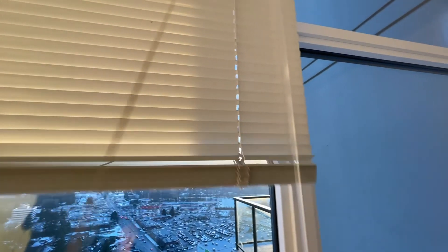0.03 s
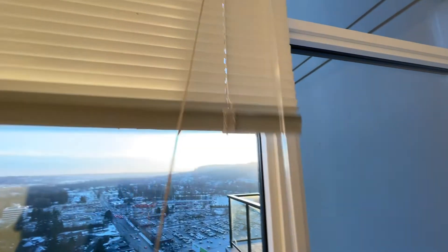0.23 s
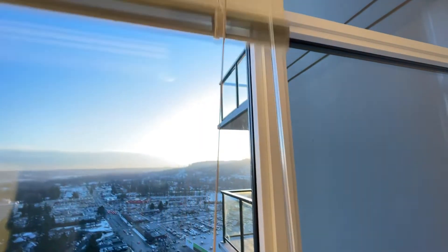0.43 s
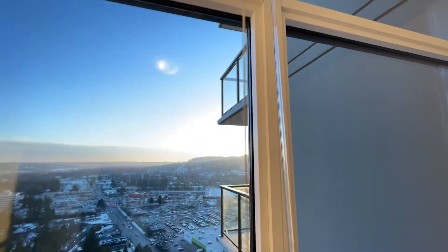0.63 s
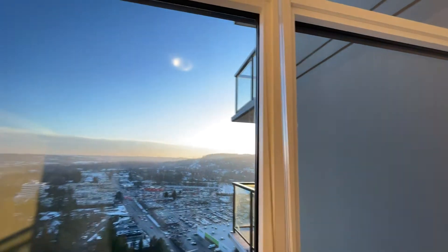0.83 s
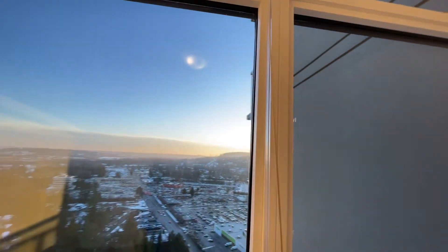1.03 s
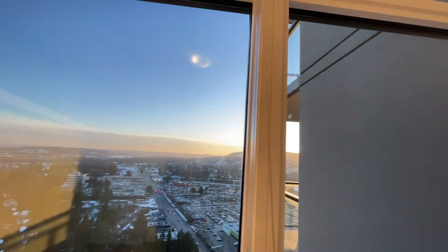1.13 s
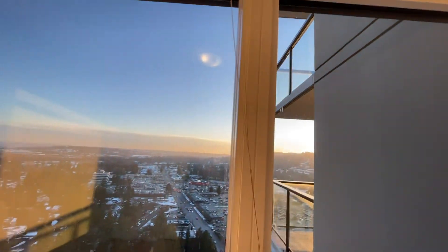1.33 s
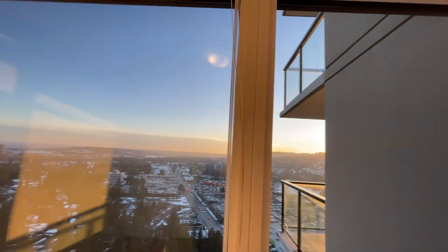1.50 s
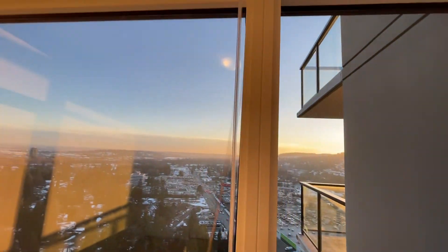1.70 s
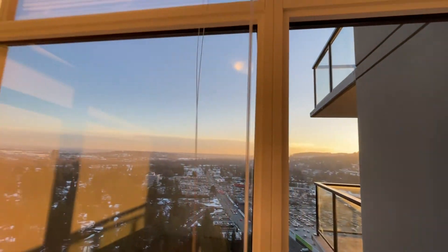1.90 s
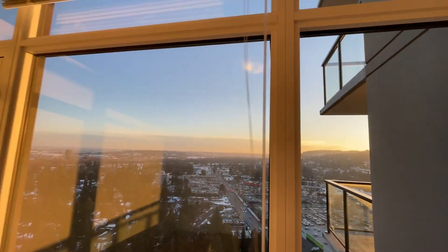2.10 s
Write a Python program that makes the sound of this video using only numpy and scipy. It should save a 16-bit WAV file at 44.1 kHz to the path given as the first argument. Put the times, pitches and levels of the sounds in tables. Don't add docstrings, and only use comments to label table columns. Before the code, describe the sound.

A slatted blind is pulled up with a quick scraping clatter, then a cord end clicks

```python
import sys
import numpy as np
from scipy import signal
from scipy.fft import rfft, irfft, next_fast_len
from scipy.io import wavfile
from scipy.ndimage import uniform_filter1d, map_coordinates

SR = 44100
rng = np.random.default_rng(int(sys.argv[2]) if len(sys.argv) > 2 else 0)


def int16_out(signal):
    q = np.round(np.clip(np.atleast_2d(signal).T, -1, 1) * 32767)
    wavfile.write(sys.argv[1], SR, q.astype(np.int16))


def volts(x):
    e = np.asarray(x, float) / 20
    return 10 ** e


N = 94903

# pitch_hz, level_db (per Hz)
VENT_RUSH = [(15, -29.5), (25, -17), (55, -1.5), (270, -15.5), (301, -16.5), (734, -17.5), (3080, -29),
             (13600, -62), (16000, -53)]
# pitch_hz, level_db (rms)
VENT_HUM = [(60, -59), (120, -63.5), (199, -60.5)]
# pitch_hz, correlation (-1 to 1)
PORT_LIKENESS = [(60, 0.66), (240, 0.78), (950, 0.075), (3770, -1), (15000, 0.35)]
VENT_DB = -50.5

# start_s, level_db
RUSTLE = [
    (.75, -48),
    (.95, -53.5),
    (1.12, -59.5),
    (1.33, -58.5),
    (1.39, -50),
    (1.46, -54.5),
    (1.52, -59.5),
    (1.8, -58),
    (2.15, -75),
]
# pitch_hz, level_db (per Hz)
CLOTH_COLOUR = [(88, -44.5), (150, -15.5), (291, -11.5), (414, -21), (1100, -10.5), (6770, -28),
                (14000, -38), (16000, -71)]
# start_s, level_db, centre_hz, width_octaves, t60_s
STACK_BUMPS = [
    (0.838, -33, 1890, 0.72, 0.23),
    (1.032, -35, 3050, 1.24, 0.1),
    (1.033, -36.5, 1940, 0.66, 0.23),
    (1.177, -36, 790, 1.04, 0.041),
    (1.19, -43.5, 396, 1.1, 0.18),
    (1.4, -41, 301, 0.27, 0.29),
    (1.85, -62, 14060, 0.04, 0.15),
]

# pitch_hz, level_db (per Hz)
SLEEVE_COLOUR = [(1180, -24), (2000, -1.5), (5420, -3), (8130, 0.5), (14500, 1), (16500, -16)]
BRUSH_S, BRUSH_DB, BRUSH_RISE_S, BRUSH_T60_S = 1.539, -36, 0.0026, 0.029
FLICK_GAP_S, SWISH_DB, SWISH_T60_S = 0.0092, -15.5, 0.38

# pitch_hz, level_db
PANE_SWING = [(62, -49.5), (104, -49), (122, -48.5), (170, -49)]
SWING_RISE_S, SWING_T60_S = 0.028, 0.39

# pitch_hz, level_db, t60_s
FRAME_MODES = [(508, -5.5, 0.081), (1113, -5.5, 0.058), (1395, -13, 0.033), (1720, -7, 0.075),
               (2205, -1.5, 0.11), (2780, 2.5, 0.057), (3280, -13, 0.047), (3840, -7.5, 0.16),
               (4380, -5.5, 0.11), (4950, -9, .08), (6080, -7, 0.027), (12030, -5, 0.088)]
# pitch_hz, level_db (per Hz)
SNAP_COLOUR = [(180, -30), (400, -28), (946, -13), (2250, -4.5), (3500, -1.5), (7440, -17), (12100, -13),
               (16000, -23)]
# pitch_hz, level_db (per Hz)
SHUDDER_COLOUR = [(180, -35), (300, -15), (521, -10.5), (2480, -8.5), (2770, -10), (7490, -20.5),
                  (9050, -24.5), (12400, -14.5), (13000, -54)]
# pitch_hz, level_db, t60_s
TASSEL_MODES = [(1350, -9, .012), (2200, -1, .012), (3400, 0, .01), (6050, -11, .008), (12000, -15, .008)]
# start_s, level_db
TASSEL_CONTACTS = [
    (1.6172, -19),
    (1.6193, -15.5),
    (1.623, -26),
]
KNOCK_S, KNOCK_DB, KNOCK_CRACK_DB, KNOCK_RISE_S = 1.6167, -28.5, 9.5, 0.00082
SHUDDER_DB, SHUDDER_T60_S = -2, 0.27
BAR_HZ, BAR_DB, BAR_RISE_S, BAR_T60_S = 8780, -0.5, 0.02, 0.22

# start_s, level_db
PULL_EFFORT = [
    (0.0, -37.5),
    (0.176, -33),
    (0.306, -30.5),
    (0.538, -27.5),
    (0.6, -28.5),
    (0.726, -32),
    (0.856, -54),
    (0.95, -63),
]
# pitch_hz, level_db (per Hz)
CORD_COLOUR = [(180, -41.5), (300, -13), (780, -2.5), (1510, -5), (1800, -1), (2700, 1.5), (6400, -2.5),
               (12300, -9), (15600, -15.5), (16500, -19)]
CORD_PATCHY_DB, CORD_WIDTH_DB = 3, 0.5

# start_s, peak_db, thud_db, rail_hum_db, sizzle_db
SLAT_CLACKS = [(0.0478, -34, -22, -25, 2.5), (0.1318, -8, -17, -15, -20), (0.1341, -16, -12.5, -35.5, 5.5),
               (0.1495, -32.5, -22, -34, -9.5), (0.1665, -20.5, -22.5, -27.5, -0.5),
               (0.1742, -15, -14, -32, -3), (0.2003, -9.5, -16.5, -16, -3.5),
               (0.2029, -18.5, -25, -32.5, -1), (0.2614, -21, -19, -32, -6.5),
               (0.278, -24.5, -7.5, -31.5, -5), (0.3316, -26, -6.5, -28, 0),
               (0.3518, -18.5, -14.5, -27.5, -0.5), (0.3548, -27, -4.5, -34.5, 6),
               (0.3635, -36.5, -19, -32, -1), (0.373, -27, -19, -29, -1), (0.3755, -9, -16.5, -23, -1.5),
               (0.3795, -20.5, -17, -32, 4.5), (0.385, -25.5, -24, -30, -4.5),
               (0.4057, -17.5, -13.5, -33, -7), (0.4296, -38, -22.5, -20, -3),
               (0.4771, -25, -24.5, -15, 10.5), (0.4914, -21.5, -4.5, -16, 4), (0.5238, -21, -15.5, -8, 4),
               (0.5404, -21, -15, -27, -5), (0.5477, -13, -12, -14.5, -1), (0.553, -17, -35, -15.5, -2),
               (0.565, -16.5, -16, -26, -1), (0.576, -24, -14, -19, -3), (0.6007, -30, -25, -12.5, 2),
               (0.625, -13.5, -30, -11, -8.5), (0.6285, -22.5, -24.5, -12, 8.5),
               (0.6557, -20.5, -12, -31, -10), (0.675, -14, -22, -27, -2), (0.68, -23, -17, -24, 1),
               (0.71, -29.5, -13, -4.5, -11), (0.7327, -22.5, -17.5, -6, -12)]
# pitch_hz, level_db, t60_s
THUD_MODES = [(780, 1, .012), (1230, 8, .015)]
# pitch_hz, level_db, t60_s
RAIL_MODES = [(2220, -12, .012), (2630, -7, .015), (3020, -10, .012), (3560, -12, .01), (4320, -12, .025),
              (4600, -3, .007), (5090, -1, .008), (6300, -6, .007), (6900, -10, .006)]
# pitch_hz, level_db, t60_s
RAIL_HUM_MODES = [(1530, 4, .055)]
# pitch_hz, level_db, t60_s
SIZZLE_MODES = [(8540, -9, 0.021), (9200, 4, 0.0043), (9840, -2, 0.0079), (11400, 6, 0.0054),
                (12200, 5.5, 0.0039), (14240, -6, 0.013), (15300, -5, 0.0073)]
CONTACTS_S, CONTACT_LOSS_DB, CRACK_DB = 0.0021, 13, -1.5
TICKS_PER_S, TICK_DB, TICK_SPREAD_DB = 600, 6.5, 3
HIT_SCATTER_DB, HIT_DETUNE, HIT_RISE_S = 2, .015, .0009

# pitch_hz, t60_s
ROOM_DECAY = [(200, 0.63), (1500, 0.53), (4000, 0.43), (12000, 0.24)]
# pitch_hz, left_over_right_db
BLIND_LEAN = [(60, 0.5), (180, -4.5), (550, 7), (1650, -7), (3000, -0.5), (5500, 12), (9000, -1.5),
              (15000, -1.5)]
# pitch_hz, left_over_right_db
FRAME_LEAN = [(300, -4.5), (2500, 1), (7000, 5)]
BLIND_ROOM_DB, KNOCK_ROOM_DB, ROOM_GAP_S = -5.5, -3.5, .004
ROOM_TURN_S = .13
BLIND_LAG_S, KNOCK_LAG_S = -.00022, -.0001
BLIND_SPAN_S, KNOCK_SPAN_S = (0, 1.2), (1.55, 2.1)

# pitch_hz, width_hz, level_db
PORT_NOTCHES = [(5540, 210, -7), (7530, 176, -13.5), (10530, 450, -8)]
# start_s, end_s, low_hz, high_hz
DROPPED_BANDS = [(0, .125, 10600, 11000), (.215, .33, 10150, 10700), (.41, .46, 10300, 10900),
                 (.57, .61, 10400, 10900), (.71, .965, 10500, 11300), (1.03, 1.385, 10400, 11100),
                 (1.45, 1.52, 10200, 11000), (1.71, 1.93, 10200, 10900), (.71, 1.535, 15100, 20000),
                 (1.633, 1.83, 12700, 20000), (1.83, 2.2, 15000, 20000)]
LOW_CUT_HZ, TOP_HZ, MONO_HZ = 39.7, 15900, 11800


def unit(x):
    return x / np.sqrt(np.mean(x ** 2) + 1e-20)


def along(points, hz):
    f, v = np.transpose(points)
    return np.interp(np.log(hz + 1), np.log(f + 1), v)


def filtered(x, response):
    m = next_fast_len(N + 8192)
    return irfft(rfft(x, m) * response(np.fft.rfftfreq(m, 1 / SR)), m)[..., :N]


def level(rows):
    s, db = np.transpose(rows)
    return volts(np.interp(np.arange(N) / SR, [s[0] - .1, *s, s[-1] + 0.55], [-100, *db, -100]))


def dying(start_s, rise_s, t60_s):
    t = np.maximum(np.arange(N) / SR - start_s, 0)
    return (1 - np.exp(-t / rise_s)) * volts(-60 * t / t60_s)


def rush(spectrum, patchy_db, channels):
    z = signal.stft(rng.standard_normal((channels, N)), nperseg=256)[2]
    field = uniform_filter1d(rng.standard_normal(z.shape[1:]), 5, 0)
    field = uniform_filter1d(field, 6, 1)
    x = signal.istft(z * volts(patchy_db * unit(field)), nperseg=256)[1][:, :N]
    return unit(filtered(x, lambda hz: volts(along(spectrum, hz))))


def rung(at_s, size_db, modes):
    t = np.arange(round(SR * np.max(np.transpose(modes)[2]))) / SR
    out = np.zeros(N + SR)
    luck = rng.standard_normal((len(at_s), 2, len(modes), 1))
    hz, db, t60 = np.transpose(modes)[:, :, None]
    rise = 1 - np.exp(-t / HIT_RISE_S)
    for s, size, (louder, sharper) in zip(at_s, size_db, luck):
        pitch = hz * (1 + HIT_DETUNE * sharper * 0.017 / t60)
        decay = volts(db + size + HIT_SCATTER_DB * louder - 60 * t / t60)
        ring = decay * np.sin(2 * np.pi * pitch * t)
        out[round(s * SR):][:len(t)] += ring.sum(0) * rise
    return out[:N]


def room(x, wet_db, lean, lag_s, span_s):
    size = round(ROOM_TURN_S * SR)
    first, last = (int(s / ROOM_TURN_S) for s in span_s)
    parts = np.pad(x, (0, -N % size)).reshape(-1, 1, size)[first:last]
    hz, t, z = signal.stft(rng.standard_normal((len(parts), 2, SR // 3)), SR, nperseg=256)
    decay = volts(-60 * t / along(ROOM_DECAY, hz)[:, None])
    tails = signal.istft(z * decay, SR, nperseg=256)[1]
    tails = tails / np.linalg.norm(tails, axis=2, keepdims=True)
    answers = signal.fftconvolve(parts, tails, axes=2)
    wet = np.zeros((2, 2 * N))
    for k, answer in enumerate(answers, first):
        start = k * size + round(ROOM_GAP_S * SR)
        wet[:, start:][:, :answer.shape[1]] += answer

    def ports(f):
        half = volts(along(lean, f) / 2) * np.exp(-1j * np.pi * f * lag_s)
        return np.array([half, 1 / half])

    return filtered(x, ports) + volts(wet_db) * wet[:, :N]


def air():
    def mid_side(hz):
        turn = np.arccos(np.clip(along(PORT_LIKENESS, hz), -1, 1)) / 2
        return np.array([np.cos(turn), np.sin(turn)])

    mid, side = filtered(rush(VENT_RUSH, 0.88, channels=2), mid_side)
    t = np.arange(N) / SR
    drift = np.cumsum(rng.standard_normal((len(VENT_HUM), N)), 1) * 0.024
    hum = sum(volts(db + 2.5) * np.sin(2 * np.pi * hz * t + d) for (hz, db), d in zip(VENT_HUM, drift))
    return volts(VENT_DB - 1) * unit(np.array([mid + side, mid - side])) + hum


def handling():
    out = volts(4) * level(RUSTLE) * rush(CLOTH_COLOUR, 1.5, channels=2)
    for s, db, hz, octaves, t60 in STACK_BUMPS:
        near, far = 2 ** octaves, 8 ** octaves
        band = [(hz / far, -70), (hz / near, -6), (hz, 0), (hz * near, -8), (hz * far, -70)]
        out = out + volts(db) * dying(s, t60 / 20, t60) * rush(band, 2, channels=2)
    return out


def brush():
    flicks = sum(dying(BRUSH_S + gap, BRUSH_RISE_S, BRUSH_T60_S) for gap in (0, FLICK_GAP_S))
    before_knock = np.arange(N) < KNOCK_S * SR
    swish = volts(SWISH_DB) * dying(BRUSH_S, .005, SWISH_T60_S) * before_knock
    return volts(BRUSH_DB) * (flicks + swish) * rush(SLEEVE_COLOUR, 1.2, channels=2)


def thump():
    t = np.arange(N) / SR - KNOCK_S
    swing = sum(volts(db + 11.0) * np.sin(2 * np.pi * hz * t) for hz, db in PANE_SWING)
    return dying(KNOCK_S, SWING_RISE_S, SWING_T60_S) * swing


def knock():
    t = np.arange(N) / SR
    rows = len(FRAME_MODES) + 1
    grid = np.meshgrid(np.arange(rows), t * 135, indexing="ij")
    flutter = 0.76 + 0.78 * map_coordinates(rng.standard_normal((rows, 300)), grid, order=1)
    ring = np.zeros(N)
    for (hz, db, t60), wave in zip(FRAME_MODES, flutter):
        tone = np.sin(2 * np.pi * hz * (t - KNOCK_S))
        ring += volts(db + 2.5) * dying(KNOCK_S, KNOCK_RISE_S, t60) * tone * wave
    bar = np.sin(2 * np.pi * BAR_HZ * t) * flutter[-1]
    ring += volts(BAR_DB) * dying(KNOCK_S, BAR_RISE_S, BAR_T60_S) * bar
    snap = volts(KNOCK_CRACK_DB) * dying(KNOCK_S, 0.00044, 0.027) * rush(SNAP_COLOUR, 0, channels=1)[0]
    shudder = volts(SHUDDER_DB) * dying(KNOCK_S, .003, SHUDDER_T60_S) * rush(SHUDDER_COLOUR, 2, channels=1)[0]
    return volts(KNOCK_DB) * (ring + snap + shudder) + rung(*np.transpose(TASSEL_CONTACTS), TASSEL_MODES)


def cord():
    hiss = rush(CORD_COLOUR, CORD_PATCHY_DB, channels=2)
    return volts(CORD_WIDTH_DB) * level(PULL_EFFORT) * hiss * volts([[1.2], [-1.2]])


def blind():
    rows = np.array(SLAT_CLACKS)
    luck = rng.random((len(rows), 2, 3))
    k = np.arange(3)
    at = (rows[:, :1] + HIT_RISE_S / 2 + CONTACTS_S * k * (0.79 + .6 * luck[:, 0])).ravel()
    size_db = rows[:, 1:2] - CONTACT_LOSS_DB * k - 4 * luck[:, 1] * (k > 0)
    clack = rung(at, size_db.ravel(), RAIL_MODES)
    for extra_db, modes in zip(rows[:, 2:].T, (THUD_MODES, RAIL_HUM_MODES, SIZZLE_MODES)):
        clack += rung(at, (size_db + extra_db[:, None]).ravel(), modes)

    blows = np.bincount(np.round(at * SR).astype(int), volts(size_db + CRACK_DB).ravel(), N)
    t = np.arange(400) / SR
    burst = volts(-60 * t / 0.0054) * (1 - np.exp(-t / HIT_RISE_S))
    crack = np.convolve(blows, burst)[:N]

    hail = rng.random((2, N))
    ticks = (hail[0] < TICKS_PER_S / SR) * volts(-TICK_SPREAD_DB * np.log(hail[1] + 1e-4))
    ticks = np.convolve(ticks, volts(-60 * t / 0.0018))[:N]
    ticks = volts(TICK_DB - 16.5) * unit(ticks)
    hiss = rush(CORD_COLOUR, CORD_PATCHY_DB, channels=1)[0]
    return clack + crack * rush(CORD_COLOUR, 0, channels=1)[0] + level(PULL_EFFORT) * ticks * hiss


def scene():
    behind = air() + handling() + brush() + thump()
    struck = room(knock(), KNOCK_ROOM_DB, FRAME_LEAN, KNOCK_LAG_S, KNOCK_SPAN_S)
    hauled = room(blind(), BLIND_ROOM_DB, BLIND_LEAN, BLIND_LAG_S, BLIND_SPAN_S)
    return behind + struck + cord() + hauled


def low_pass(x):
    return signal.sosfilt(signal.butter(12, 16610, fs=SR, output="sos"), x)


def record(dry):
    def ports(f):
        dips_db = sum(db * np.exp(-((f - centre) / width) ** 2) for centre, width, db in PORT_NOTCHES)
        low_cut = 1 / (1 + (LOW_CUT_HZ / (f + 1)) ** 4)
        top_cut = volts(-45 / (1 + np.exp((TOP_HZ - f) / 50)))
        return volts(dips_db) * low_cut * top_cut

    def above(f, edge_hz):
        return .5 + .5 * np.tanh((f - edge_hz) / 60)

    heard = filtered(dry, ports)
    t = np.arange(N) / SR
    for start, end, low, high in DROPPED_BANDS:
        gate = uniform_filter1d(1. * ((t >= start) & (t < end)), size=300)
        heard = heard - gate * filtered(heard, lambda f: above(f, low) - above(f, high))
    top = filtered(heard, lambda f: above(f, MONO_HZ))
    mix = heard - .8 * (top - top.mean(0))
    return low_pass(mix)


dry = scene()
out = record(dry)
int16_out(out)
```